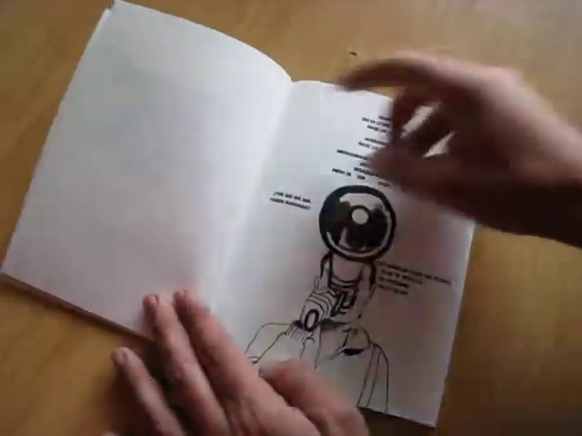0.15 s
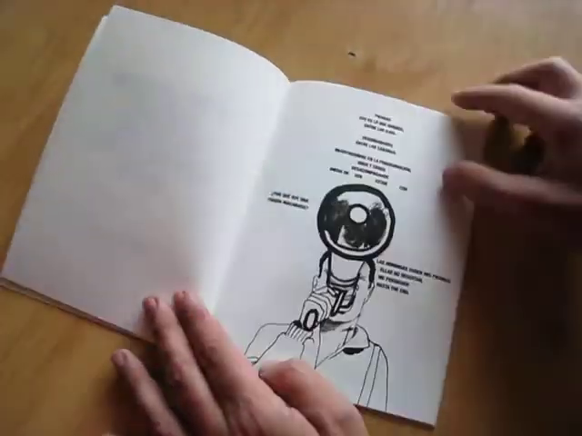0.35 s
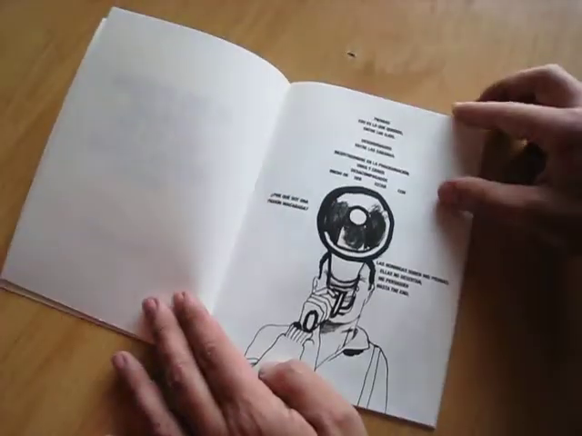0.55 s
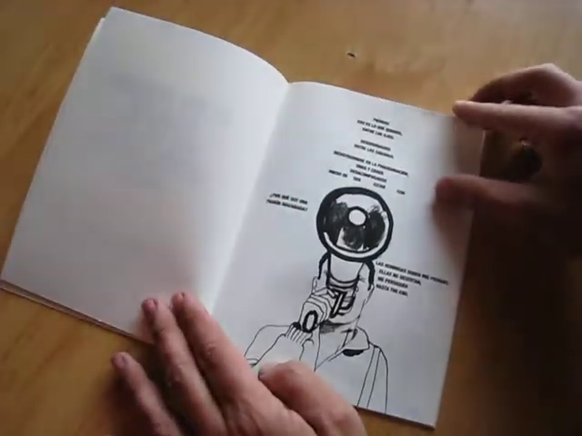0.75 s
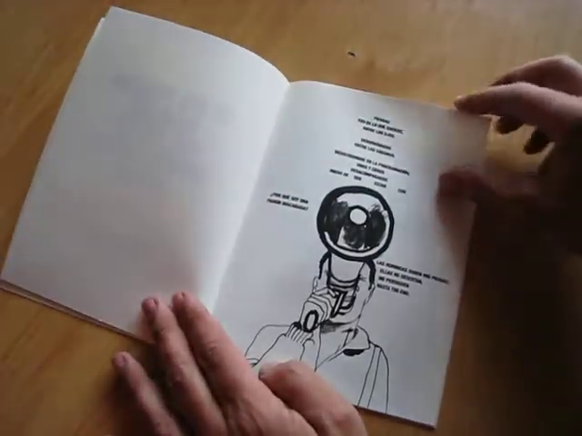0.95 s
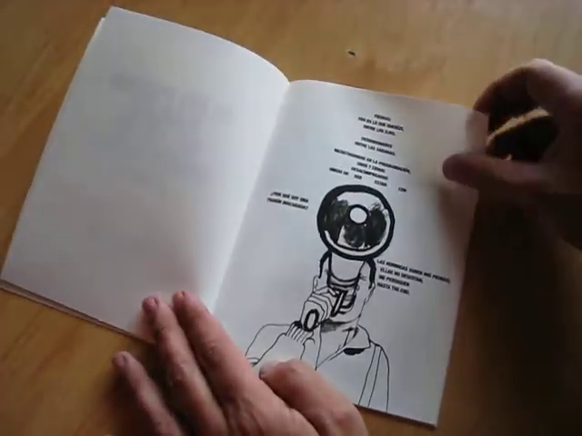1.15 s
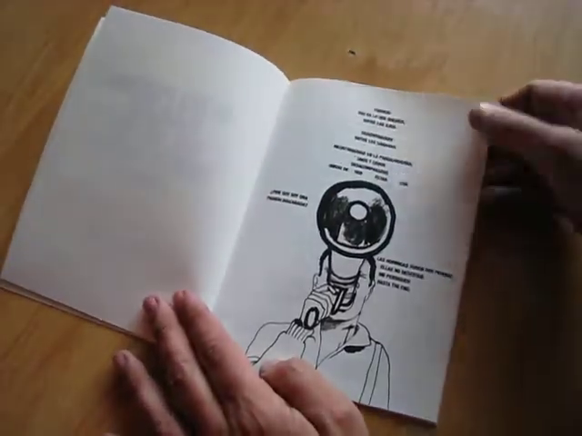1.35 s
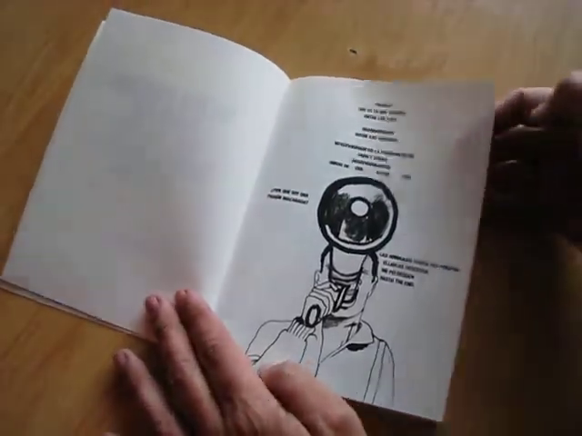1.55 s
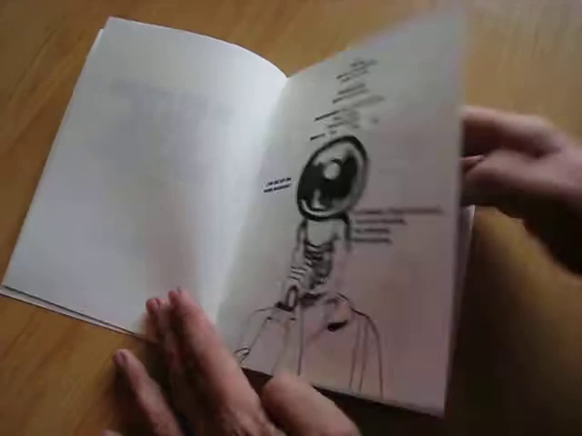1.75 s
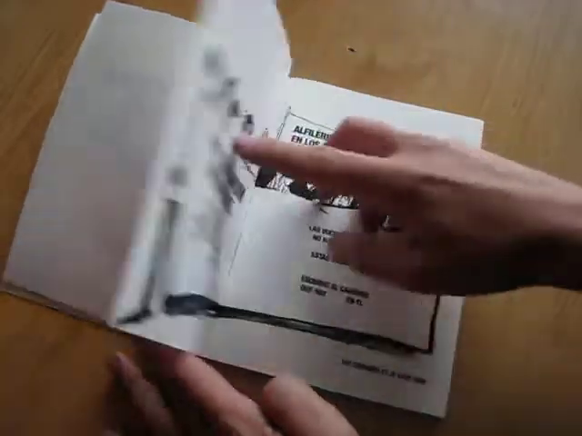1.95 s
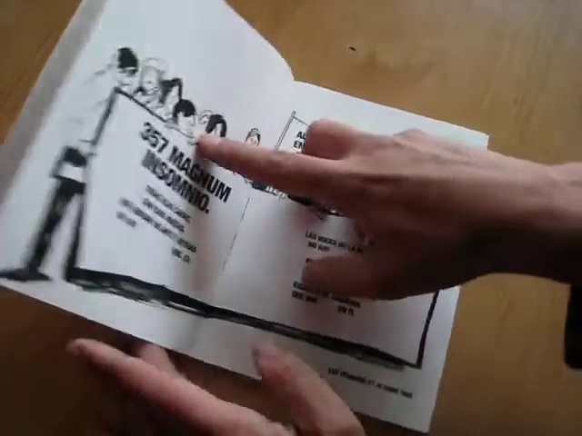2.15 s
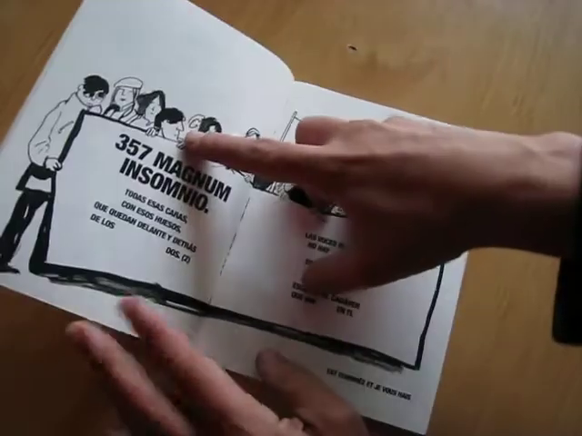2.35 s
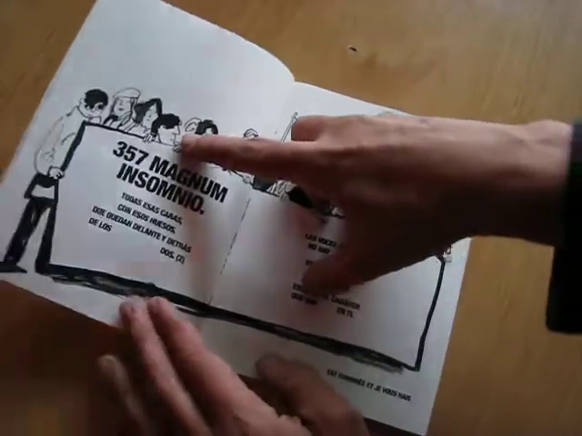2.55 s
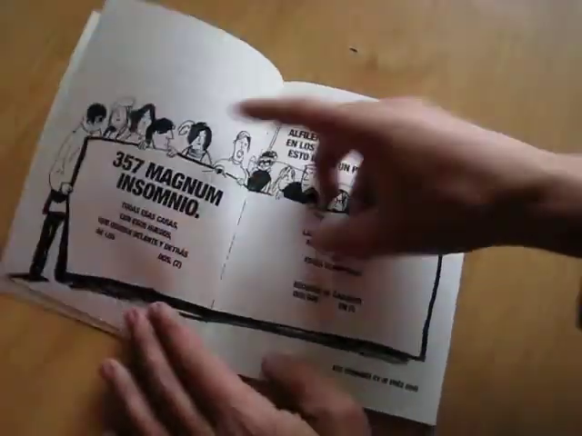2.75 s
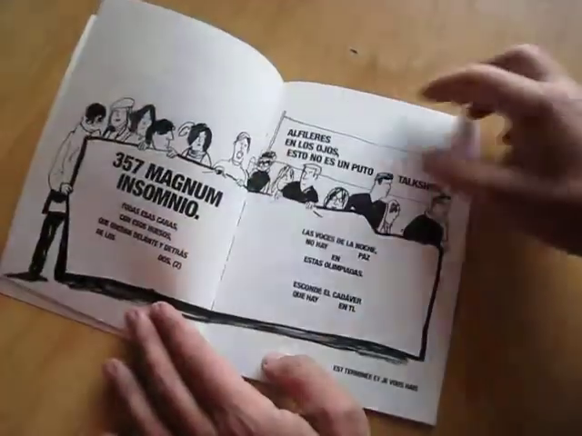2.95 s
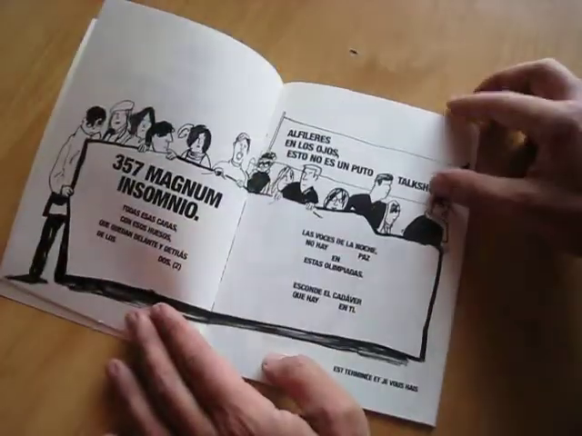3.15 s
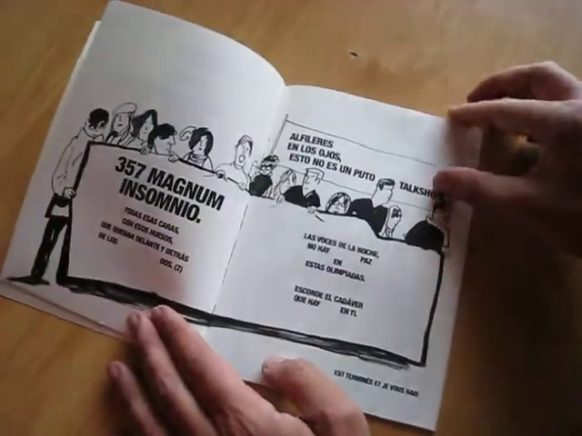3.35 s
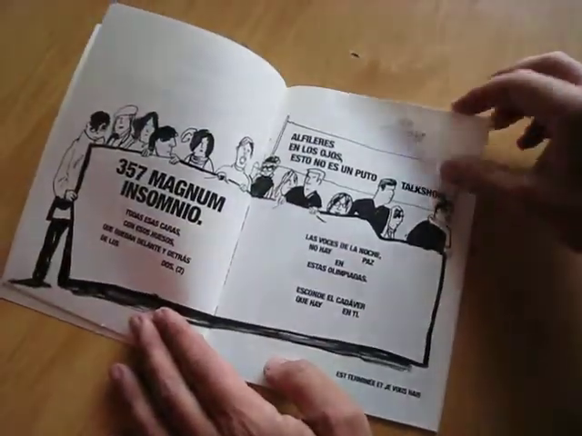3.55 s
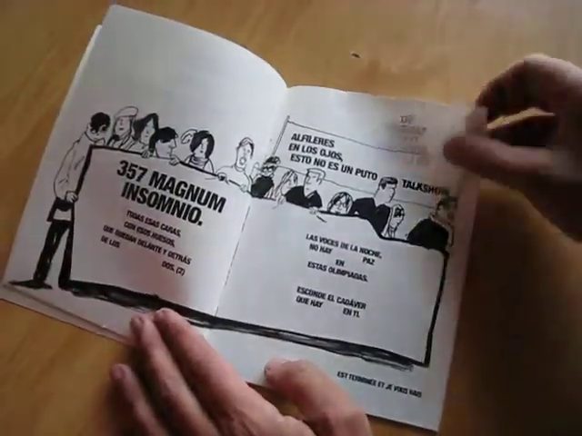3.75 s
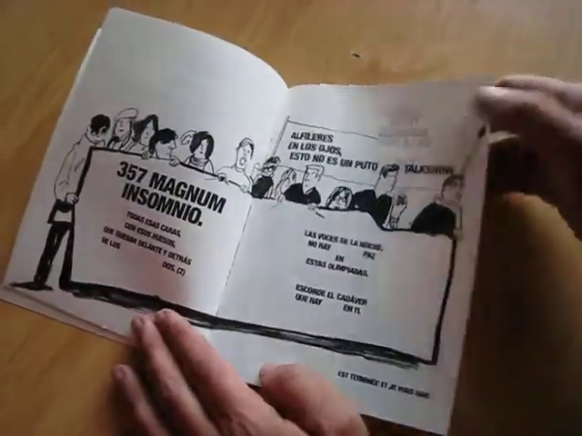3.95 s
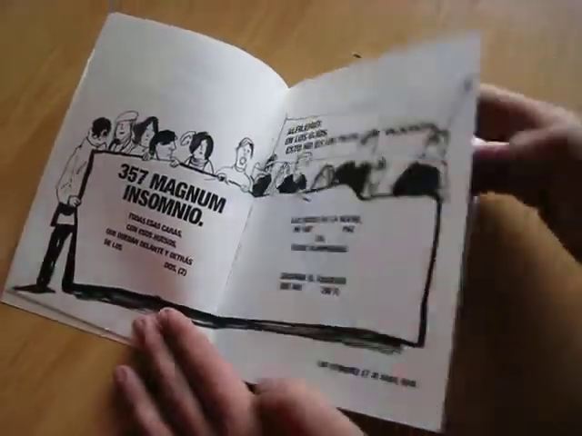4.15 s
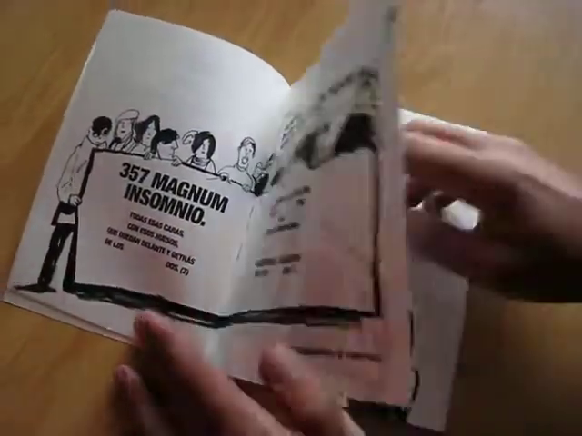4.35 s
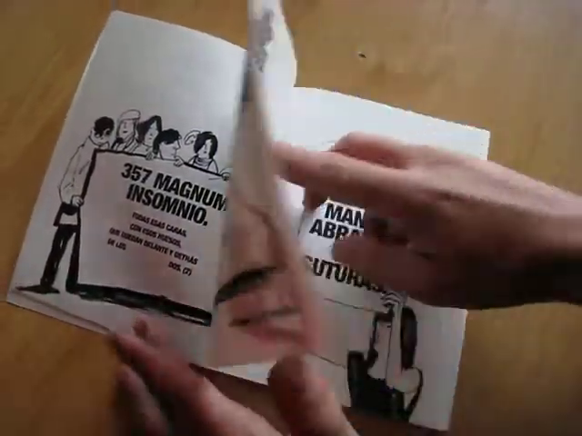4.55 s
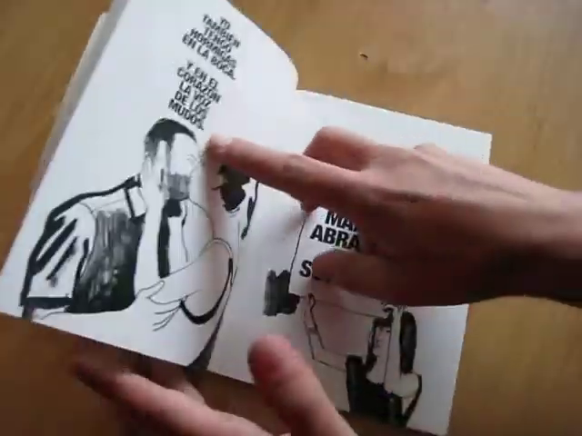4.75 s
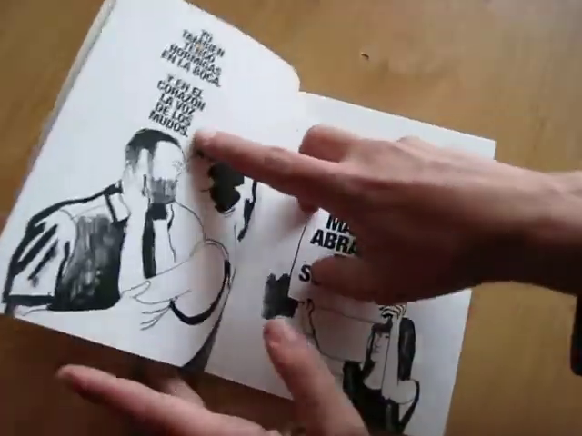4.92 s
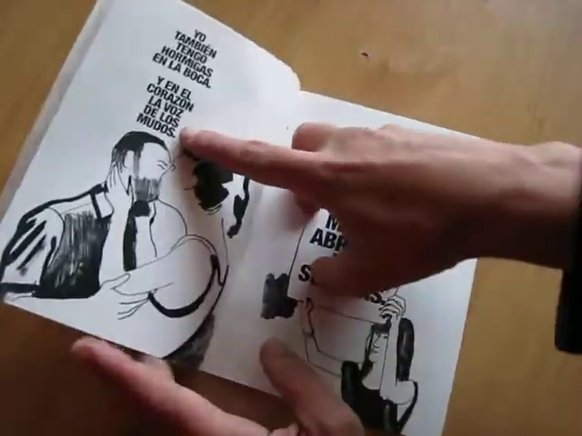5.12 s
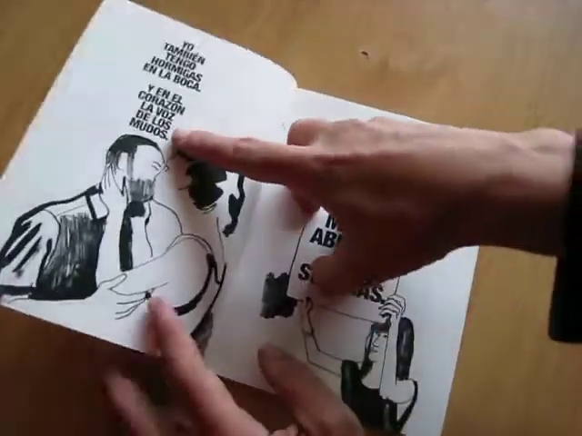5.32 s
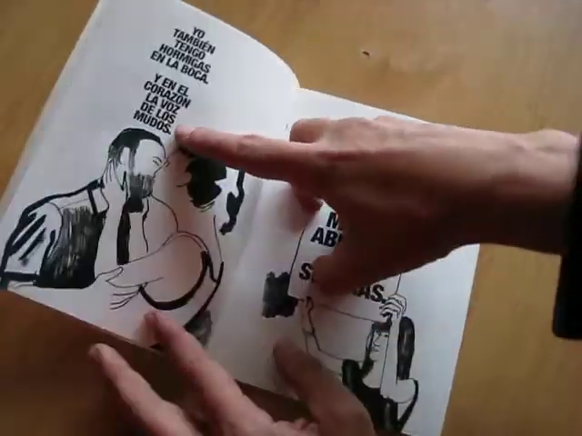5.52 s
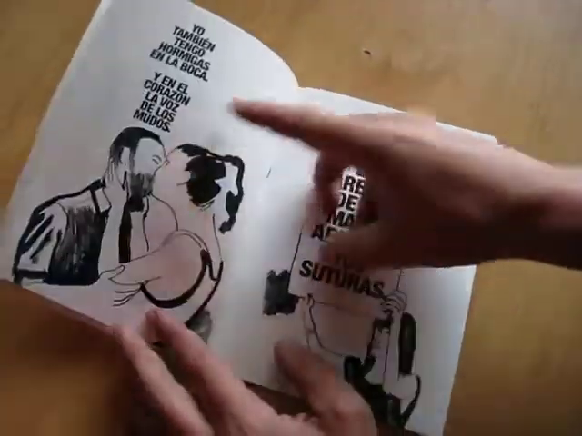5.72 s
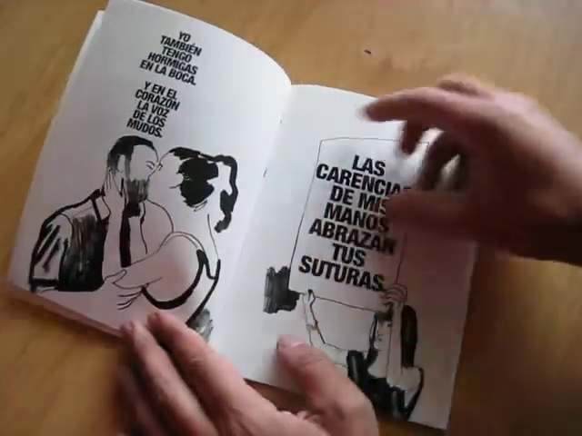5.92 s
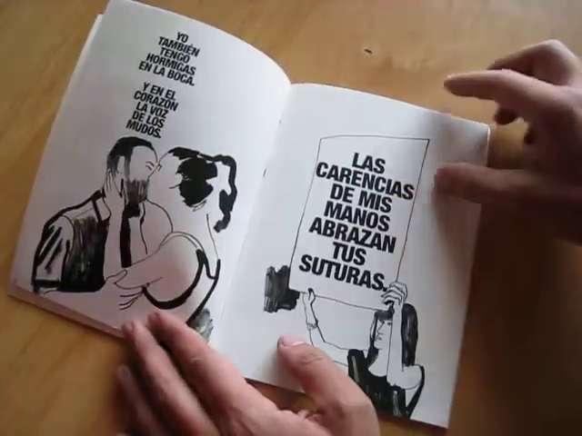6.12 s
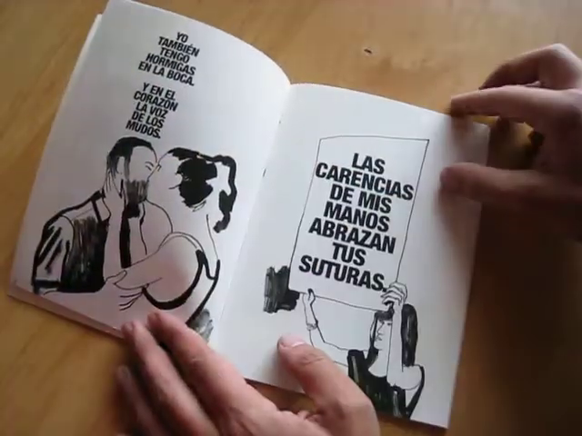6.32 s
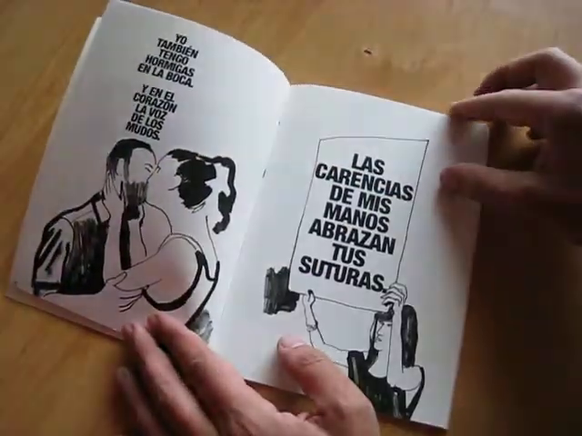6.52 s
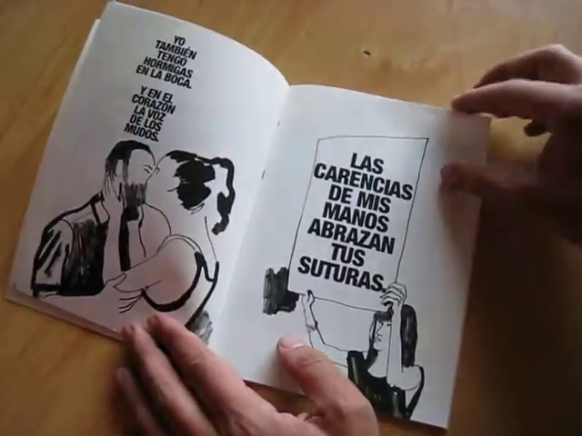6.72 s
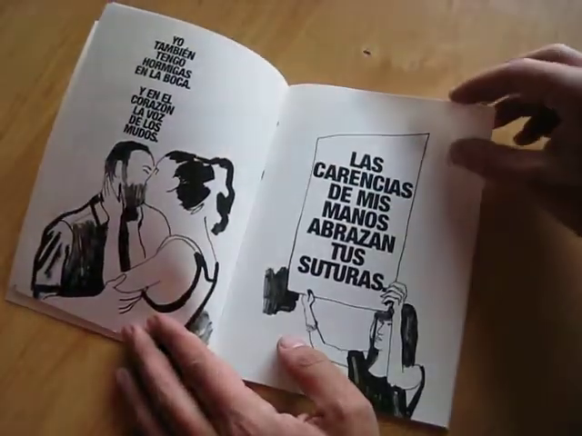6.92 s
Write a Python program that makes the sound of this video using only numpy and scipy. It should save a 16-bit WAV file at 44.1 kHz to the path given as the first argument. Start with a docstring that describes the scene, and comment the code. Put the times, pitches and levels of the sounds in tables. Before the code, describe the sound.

Dry fingertip skids and light paper friction lead to two page turns, the first snapping down after about two seconds, the second harder and more crackly after four and a half. Between and after them come quiet rubs, small crinkles and nail clicks on page edges. Everything is close and nearly dry, with a short dull tail from table and walls, above low room hiss and a thin buzzing electronic tone.

```python
"""Small quiet room, wooden table: a hand turns two pages of a thin paperback, close to a small camera.
Fingers rub and skid over the paper: shaped noise made of dense random clicks.
Sheets buckle, slap down and crinkle, nails catch page edges: short forces ring modes and disperse.
Under it lie steady shaped room noise and a faint high electronic whine, a swept sine with
an overtone, that warbles about thirty times a second."""
import sys
import numpy as np
from scipy import signal
from scipy.fft import rfft, irfft
from scipy.io import wavfile
from scipy.ndimage import uniform_filter1d, map_coordinates

SR = 44100
rng = np.random.default_rng(int(sys.argv[2]) if len(sys.argv) > 2 else 0)


def dump(signal):
    """Clip the signal to [-1, 1] and save it as 16-bit WAV at the path in sys.argv[1]."""
    limited = np.clip(np.atleast_2d(signal).T, -1, 1)
    pcm = np.round(limited * 32767).astype(np.int16)
    wavfile.write(sys.argv[1], SR, pcm)


N = 307818
TIME = np.arange(N) / SR


def undb(db):
    """Decibels to gain."""
    return 10 ** (np.asarray(db) / 20)


def unit(x):
    """Scale to rms 1."""
    return x / np.sqrt(np.mean(x ** 2) + 1e-20)


def add(out, start_s, x):
    """Mix a short sound in at its time."""
    i = int(start_s * SR)
    out[i:i + len(x)] += x[:N - i]


def colour(x, points):
    """Shape a sound by a (frequency [Hz], level [dB]) spectrum, linear in log frequency; rms 1."""
    hz, db = np.transpose(points)
    bin_hz = np.maximum(np.arange(N // 2 + 1) * SR / N, 1)
    gain = undb(np.interp(np.log(bin_hz), np.log(hz), db))
    return unit(irfft(rfft(x) * gain, N))


def tilted(x, db_per_octave):
    """Brighten or darken a sound from 1 to 8 kHz; rms 1."""
    return colour(x, [(1000, 0), (8000, 3 * db_per_octave)])


def ring(force, modes):
    """Pass a force through parallel resonances (frequency [Hz], width [Hz], level [dB])."""
    out = np.zeros(len(force))
    for hz, width_hz, db in modes:
        out += undb(db) * signal.lfilter(*signal.iirpeak(hz, hz / width_hz, fs=SR), force)
    return out


def lowpass(x, hz):
    """Second-order low-pass."""
    return signal.lfilter(*signal.butter(2, hz, fs=SR), x)


def walk(rate_hz):
    """Smooth random wander, rms 1."""
    size = int(SR / rate_hz)
    steps = np.repeat(rng.standard_normal(N // size + 1), size)
    return unit(uniform_filter1d(steps, size)[:N])


def disperse(x, lag_s):
    """Bending waves in paper: the treble runs ahead, 1 kHz arrives lag_s later, the bass later still."""
    khz = np.arange(len(x) // 2 + 1) * SR / len(x) / 1000
    # group delay = lag_s / sqrt(khz)
    return irfft(rfft(x) * np.exp(-4j * np.pi * 1000 * lag_s * np.sqrt(khz)), len(x))


def slips(spread_db, uneven_db):
    """Countless fibres catch and let go: dense clicks of uneven size that come in clusters."""
    clicks = rng.standard_normal(N) * undb(spread_db * rng.standard_normal(N))
    return clicks * undb(uneven_db * (walk(260) + walk(45)))


def shimmer(x, depth_db):
    """The contact patch keeps changing, so each half-octave of the rub swells and fades on its own."""
    spectrum = rfft(x)
    bin_hz = np.maximum(np.arange(len(spectrum)) * SR / N, 1)
    half_octaves = 2 * np.log2(bin_hz / 1000)
    out = np.zeros(N)
    for k in range(-2, 10):
        band = irfft(spectrum * np.maximum(1 - abs(half_octaves - k), 0), N)
        out += band * undb(depth_db * walk(22))
    return out


def room_noise():
    """Steady noise of the quiet room, shaped by a fixed spectrum."""
    # (frequency [Hz], relative level [dB])
    noise_spectrum = [(20, -6), (40, -5), (100, -3.5), (300, -1.5), (600, -3.5), (1100, -1.5), (1600, -7.5),
                      (2300, -7), (4000, -11), (5000, -11), (6000, -5.5), (7300, -12), (10000, -16.5),
                      (16000, -23)]
    return undb(-52.5) * colour(rng.standard_normal(N), noise_spectrum)


def whine():
    """The camera's power circuit sings, lower at high effort; a load burst each frame pulls it lower, louder."""
    frame_hz = 29.84
    # effort surges once a second
    surge_first_s, surge_every_s, surge_s, surge_ease_s = .17, 1.0, .22, .04
    surging = 1. * ((TIME - surge_first_s) % surge_every_s < surge_s)
    surge = uniform_filter1d(surging, int(surge_ease_s * SR))
    effort = .27 + .42 * surge + .09 * walk(7)

    cycle = 2 * np.pi * frame_hz * (TIME - .004)
    # higher effort lengthens the burst
    load = (1 + np.tanh(4 * (np.cos(cycle) - 1.1 + 2.0 * effort + .18 * walk(40)))) / 2

    # base pitches, ahead of drift and jitter
    zero_effort_hz, loaded_hz, effort_sag_hz, drift_hz_per_s = 6655, 6395, 135, 5
    idle_hz = zero_effort_hz - effort_sag_hz * effort
    jitter_hz = 32 * walk(330) * (1 + load)
    hz = idle_hz + (loaded_hz - idle_hz) * load + drift_hz_per_s * TIME + jitter_hz
    phase = 2 * np.pi * np.cumsum(hz) / SR
    tone = undb(-55.5 + 3.6 * load + 0.35 * walk(220)) * np.sin(phase)
    overtone = undb(-66.5 - 4.3 * load) * np.sin(2 * phase)
    return np.sqrt(2) * (tone + overtone)  # levels above are rms


def room_tail(x, t60_s, wet_db, dull_hz):
    """The table and near walls return a short, dull tail: decaying low-passed noise, convolved."""
    t = TIME[:SR // 2]
    decay = np.exp(-np.log(1000) * t / t60_s)
    tail = lowpass(rng.standard_normal(len(t)), dull_hz) * decay * (t > .003)
    return x + undb(wet_db) * signal.fftconvolve(x, tail / np.linalg.norm(tail))[:N]


def ticks():
    """A nail catches page edges: the click's bending wave runs on and rings the edges a moment later."""
    # (time [s], strength [dB])
    catches = [(0.996, -21), (2.177, -10), (3.569, -19), (3.836, -15), (4.6285, -11), (4.9315, -22),
               (5.0486, -22), (6.7214, -11.5), (6.74, -9.5), (6.9622, -7.5)]
    # stack of page edges: (frequency [Hz], width [Hz], relative level [dB])
    edge_modes = [(1290, 300, 6.5), (3000, 290, 6), (3710, 750, 7.5), (5150, 610, -4), (11700, 5900, -55)]
    out, t = np.zeros(N), TIME[:SR // 20]
    for start_s, db in catches:
        scrape = 0.036 * rng.standard_normal(len(t)) * np.exp(-t / 0.0066)
        force = (t == 0) + scrape
        click = disperse(ring(force, edge_modes), lag_s=0.00122)
        # 0.5 ms early to offset part of the lag
        add(out, start_s - .0005, undb(db) * click / np.linalg.norm(click))
    return out


def swipes():
    """A fingertip skids over the paper's grain: rasp pitch follows finger speed, the fine hiss dies first."""
    # (time [s], length [s], level [dB], rasp centre at start [Hz], at end [Hz],
    #  fine hiss re rasp [dB], share of length spent pressing down)
    skids = [(0.196, 0.065, -30.5, 4306, 1970, 0.5, 0.19), (2.797, 0.062, -39, 4120, 3800, -12, 0.28),
             (2.86, 0.026, -37.5, 4210, 4000, -10, 0.26), (2.884, 0.068, -27, 4385, 3200, -18, 0.023),
             (3.95, 0.1, -42.5, 5900, 8000, -12, 0.45), (4.541, 0.041, -38, 4400, 5000, -10, 0.67),
             (5.670, 0.33, -47.5, 1640, 1200, -20, 0.2)]
    # (frequency [Hz], relative level [dB]), at playback speed 1
    rasp_spectrum = [(200, -35), (700, -9.5), (1150, -5.5), (2000, -8.5), (2900, 3.5), (3600, 5),
                     (4500, -1.5), (6000, -6), (8000, -8.5), (12000, -10), (15500, -15)]
    rasp_hz = 3600  # rasp centre at playback speed 1
    out = np.zeros(N)
    grain = colour(slips(spread_db=0, uneven_db=1.5), rasp_spectrum)
    fibres = slips(spread_db=4, uneven_db=1.0)
    hiss = colour(fibres, [(4000, -21), (7000, 2), (10000, -9), (13000, 0), (15500, 2)])
    for start_s, length_s, db, first_hz, last_hz, hiss_db, rise in skids:
        progress = np.arange(int(length_s * SR)) / (length_s * SR)
        speed = (first_hz + (last_hz - first_hz) * progress ** 2) / rasp_hz
        first = int(start_s * SR)
        rasp = map_coordinates(grain[first:first + SR], [np.cumsum(speed)])
        fine = undb(hiss_db) * (1 - progress) * hiss[first:first + len(progress)]
        pressure = np.minimum(progress / rise, 1) * (1 - progress) ** 0.45
        add(out, start_s, undb(db) * pressure * (rasp + fine))
    return out


def strokes(table):
    """Each stroke swells, holds, eases off and settles; returns levels of friction, flexing and fine hiss."""
    settle_db, settle_s = -12, 0.16  # the paper creeps on: level, time to fall by 1 / e
    power = np.zeros((3, N))
    for start_s, attack_s, hold_s, release_s, db, flex_db, hiss_db in table:
        since = TIME - start_s
        easing = np.maximum(since - attack_s - hold_s, 0)
        creep = undb(settle_db) * np.exp(-easing / settle_s)
        fade = np.maximum(1 - easing / release_s, creep)
        pressure = np.clip(since / attack_s, 0, 1) * fade
        power += np.outer(undb([db, db + flex_db, db + hiss_db]), pressure) ** 2
    return np.sqrt(power)


def flap(swell_s, decay_s, dull_hz, stretch):
    """A snap plus a swelling, dying run of crumples, all ringing the sheet; softer contact is duller."""
    # sheet: (frequency before stretch [Hz], width [Hz], relative level [dB])
    sheet_modes = [(345, 58, -22.5), (763, 86, -0.5), (1052, 210, 7.5), (1150, 250, -7), (1590, 790, -1.5),
                   (2670, 510, 2), (3260, 500, -37)]
    snap_s = 0.0016  # much quicker is all snap, slower is mostly crumple
    t = TIME[:SR // 5]
    chance = rng.standard_normal((2, len(t)))
    envelope = np.exp(-t / decay_s) * (1 - np.exp(-t / swell_s)) ** 2
    crumples = chance[0] * undb(5.7 * chance[1]) * envelope
    snap_share = 1 / (1 + swell_s * decay_s / snap_s ** 2)
    modes = [(hz * stretch, width_hz, db) for hz, width_hz, db in sheet_modes]
    out = np.zeros(len(t))
    for force, energy in ((1. * (t == 0), snap_share), (crumples, 1 - snap_share)):
        body = ring(force, modes)
        dull = lowpass(lowpass(body, dull_hz), dull_hz)
        sound = disperse(dull + undb(-34) * body, lag_s=0.001292)
        out += np.sqrt(energy) * sound / np.linalg.norm(sound)
    # a thin sheet hardly radiates bass
    return signal.lfilter(*signal.butter(2, 95, "high", fs=SR), out)


def crinkles(flex):
    """Small buckles of a moving sheet come at random, scaled by how much it flexes at that moment."""
    crinkles_per_s = 18
    level_db, spread_db = 23.5, 3.5  # re flexing
    count = int(crinkles_per_s * N / SR)
    out = np.zeros(N)
    places = rng.integers(0, N, count)
    for place, (size, pitch) in zip(places, rng.uniform(-1, 1, (count, 2))):
        strength = flex[place] * undb(level_db + spread_db * size)
        stretch = 1.08 * np.exp(.3 * pitch)
        buckle = flap(swell_s=0.0011, decay_s=0.0052, dull_hz=3000, stretch=stretch)
        add(out, place / SR, strength * buckle)
    return out


def sliding():
    """Paper drags over paper and skin: the bent sheet radiates lows and crinkles, the contact the highs."""
    # fingers rub the page or feel for its edge: (time [s], attack [s], hold [s], release [s],
    #  friction before trim [dB], flexing re friction [dB], fine hiss re friction [dB])
    finger_strokes = [(0.275, .01, 0.025, 0.11, -51.5, -10, -3.5), (0.67, .02, .27, .04, -61, 2, -2),
                      (0.988, 0.0067, .11, .03, -44.5, -11, -5.5),
                      (1.115, 0.0088, .13, 0.15, -42.5, -10, -2.5),
                      (1.41, .11, 0.13, 0.046, -41.5, -8.5, -5), (2.448, .01, .02, 0.08, -55.5, -5, 7),
                      (2.595, 0.024, .03, 0.17, -48, -4.5, -4), (3.2, 0.027, 0.27, .05, -60, -3.5, -4),
                      (3.56, 0.0052, 0.053, .03, -44, -12.5, -9), (3.62, 0.027, 0.043, .04, -39, -10, -6),
                      (3.695, .04, .12, 0.087, -41.5, -15, -1.5), (3.9, 0.018, .07, 0.097, -45.3, -7, -1),
                      (4.79, 0.048, .02, .07, -49, -5, -8), (5.34, 0.063, 0.11, .04, -56.5, -6, 4.5),
                      (5.55, 0.038, 0.036, 0.064, -51.5, -5, -4), (5.66, .25, .025, 0.077, -41, -14, 0.5),
                      (5.96, .03, .02, .16, -50.5, -6, -3.5)]
    # a lifted sheet slides over its neighbour or is stroked flat: (time [s], attack [s], hold [s],
    #  release [s], friction before trim [dB], flexing re friction [dB], fine hiss re friction [dB])
    page_strokes = [(1.55, .2, .08, .04, -39.5, 4.3, -9), (1.85, 0.028, .07, 0.034, -43.5, 4.5, -5.5),
                    (2.065, 0.033, 0.14, 0.027, -42, -1.5, -4.5), (3.92, .13, 0.11, .06, -52.5, 5, -0.5),
                    (4.17, 0.034, 0.027, 0.1, -43.5, 2, -9), (4.25, 0.073, 0.041, 0.079, -40.5, 2, -9),
                    (4.39, .02, 0.12, 0.094, -46.5, 0, -5.5), (4.88, 0.31, 0.079, 0.022, -45.2, -1.3, -4.5)]
    # spectra of sheet, contact, fine hiss: (frequency [Hz], relative level [dB])
    flex_spectrum = [(20, -70), (180, -25), (350, -19.5), (650, -7), (1100, 2), (1500, -6.5), (2100, -14.5),
                     (3000, -13.5), (6000, -36)]
    rub_spectrum = [(900, -28), (1700, -3.5), (2200, -8.5), (3000, 1.5), (4200, 0), (5600, -4), (9000, -17),
                    (13000, -63)]
    hiss_spectrum = [(3000, -77), (6000, 2.5), (9000, 3), (12500, -1), (16000, -4.5)]

    finger, page = strokes(finger_strokes), strokes(page_strokes)
    flex, hiss = np.hypot(finger[1:], page[1:])
    sheet = colour(slips(spread_db=5.5, uneven_db=2.0), flex_spectrum)
    coarse = colour(shimmer(slips(spread_db=4.5, uneven_db=0.67), depth_db=1.85), rub_spectrum)
    fine = colour(shimmer(slips(spread_db=2.5, uneven_db=.5), depth_db=2.1), hiss_spectrum)
    # skin on paper rubs brighter than paper on paper
    rub = finger[0] * tilted(coarse, db_per_octave=2) + page[0] * tilted(coarse, db_per_octave=-2.5)
    # the finger's grip tightens and eases many times a second
    grip = undb(1.13 * walk(110))
    contact = grip * (undb(-.5) * rub + undb(-1.0) * hiss * fine)
    return undb(-0.3) * flex * sheet + contact + crinkles(flex)


def flaps():
    """Each page is touched, buckles as it is lifted and slaps down on the other side."""
    # (time [s], strength [dB], swell [s], crumple decay [s], dull above [Hz], mode stretch [ratio])
    impacts = [(0.255, -15, .0016, 0.0028, 1400, 1.17), (0.68, -23.5, .002, .005, 1400, 1.2),
               (1.672, 6.2, 0.0042, .013, 1660, 1.19), (1.814, -5.5, 0.0011, 0.01, 3000, 1.2),
               (2.097, -14, .003, 0.0063, 3500, 0.79), (2.167, -3.5, .0046, 0.0055, 5000, 1.6),
               (2.1766, 8.8, 0.0008, .0028, 4300, 0.97), (2.181, 1.5, .002, 0.0059, 1080, 0.96),
               (2.454, -20.5, 0.0011, 0.0044, 1800, 0.97), (4.129, -8, 0.00088, .004, 1400, 1.03),
               (4.138, -3.5, 0.0037, 0.014, 1350, 1.01), (4.51, -12, .0005, .002, 2800, 1.07),
               (4.555, -3.5, .011, 0.0073, 4400, 1.04), (4.6259, 12, 0.00058, 0.019, 4430, 1.07),
               (4.662, 8.5, 0.00043, 0.013, 2430, 1.03), (4.68, 3.5, .005, 0.015, 2000, 1.56)]
    out = np.zeros(N)
    for start_s, db, swell_s, decay_s, dull_hz, stretch in impacts:
        add(out, start_s, undb(db) * flap(swell_s, decay_s, dull_hz, stretch))
    return out


def scene():
    """Paper sounds with the room's tail, over noise and whine; the same signal in both channels."""
    background = room_noise() + whine()
    paper = ticks() + swipes() + sliding() + flaps()
    paper = room_tail(paper, t60_s=0.3, wet_db=-17.5, dull_hz=2480)
    return np.tile(background + paper, (2, 1))


def record(dry):
    """The camera cuts the top: steep elliptic low-pass at 15.9 kHz."""
    return signal.sosfilt(signal.ellip(10, .1, 80, 15900, fs=SR, output="sos"), dry)


dry = scene()
out = record(dry)
dump(out)
```